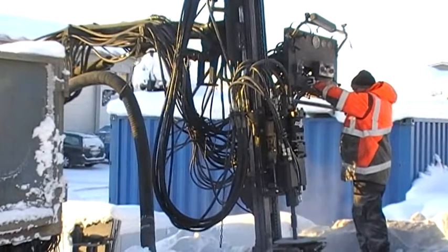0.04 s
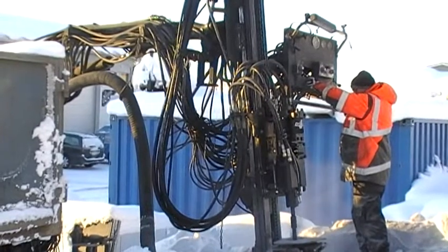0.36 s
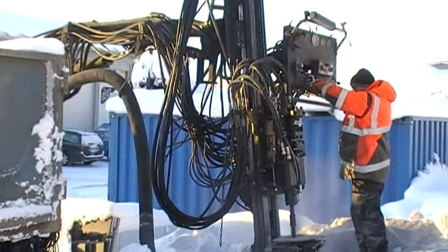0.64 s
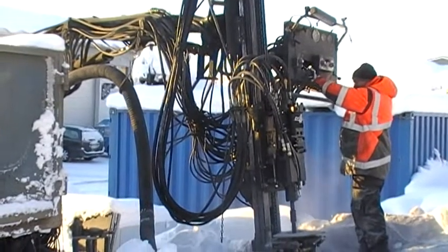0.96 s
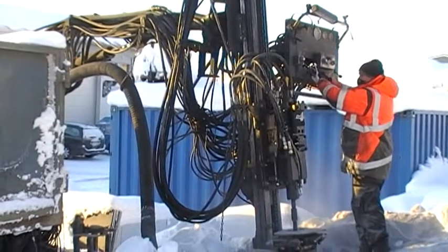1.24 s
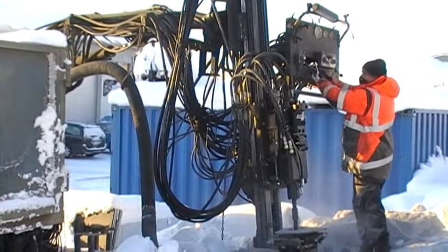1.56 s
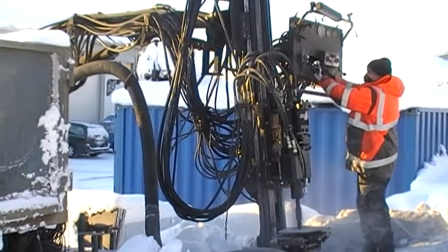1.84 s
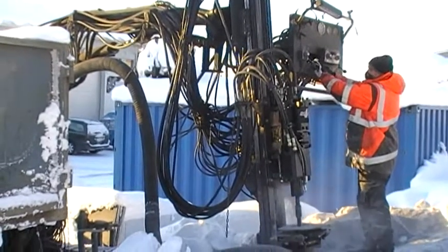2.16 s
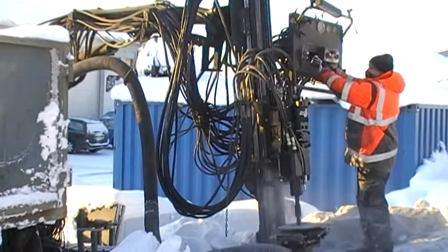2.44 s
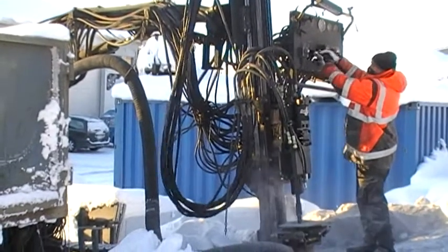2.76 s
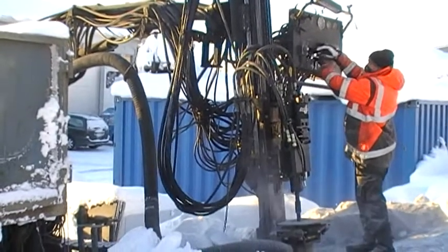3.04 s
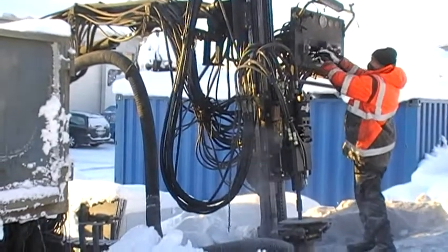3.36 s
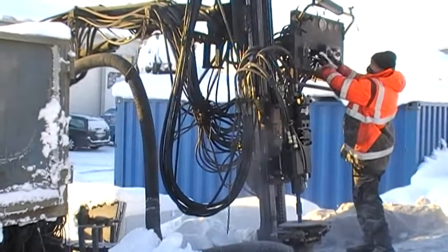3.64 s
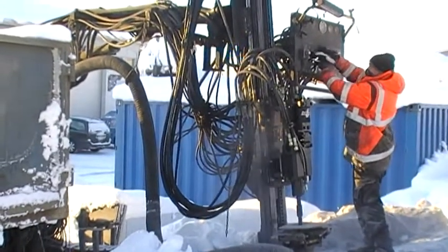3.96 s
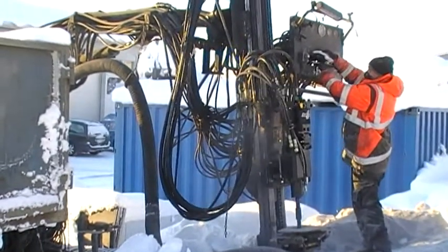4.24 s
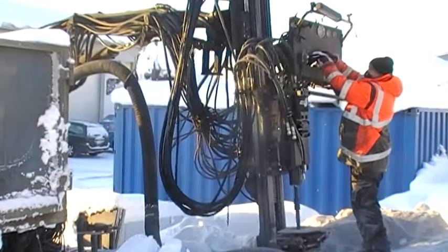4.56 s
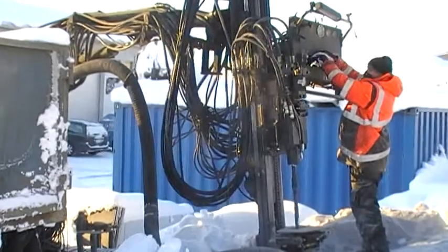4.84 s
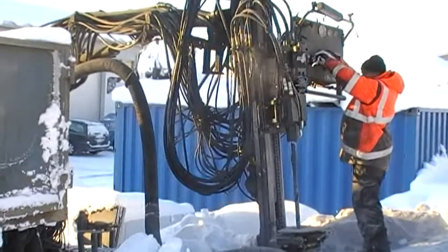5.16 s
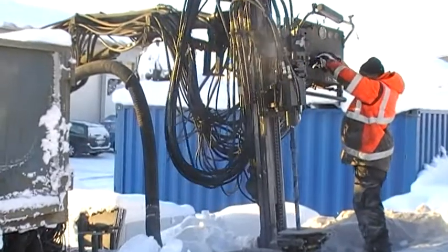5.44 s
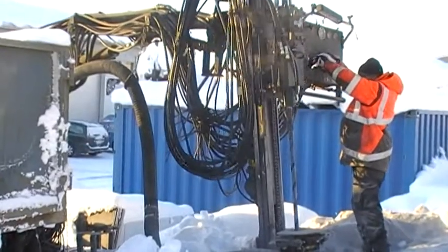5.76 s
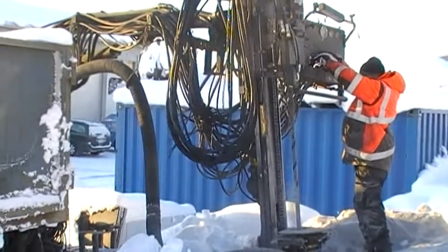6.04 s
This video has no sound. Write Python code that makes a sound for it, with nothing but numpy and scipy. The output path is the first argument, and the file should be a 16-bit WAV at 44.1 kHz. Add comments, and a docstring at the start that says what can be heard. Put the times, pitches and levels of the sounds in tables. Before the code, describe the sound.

A rock drill hammers steel rapidly and stops; diesel roar and air hiss swell, with clanks, shrill scraping and a wavering hydraulic squeal.

```python
"""A rock drill rig in a snowy yard, a few metres in front of a camera's stereo microphone, in gusty wind.
The hammer pounds the steel rod about fifty times a second and stops; as the gain control recovers,
diesel, fan and flushing air swell up. The turning rod clanks and scrapes shrilly, then the feed lifts
the drill head with a wavering hydraulic squeal, a chattering valve sounding through its pipes."""
import sys
import numpy as np
from scipy import signal
from scipy.fft import rfft, irfft
from scipy.io import wavfile
from scipy.ndimage import uniform_filter1d

SR = 44100
rng = np.random.default_rng(int(sys.argv[2]) if len(sys.argv) > 2 else 0)


def master(y):
    """Save y as 16-bit WAV."""
    cut = np.clip(np.atleast_2d(y).T, -1, 1)
    pcm = np.round(cut * 32767)  # scale
    wavfile.write(sys.argv[1], SR, pcm.astype(np.int16))


N = 273861
T = np.arange(N) / SR
HZ = np.fft.rfftfreq(N, 1 / SR)


def amp(db):
    """Decibels to gain."""
    return 10 ** (np.asarray(db) / 20)


def unit(x):
    """Scales to an rms of one."""
    return x / np.sqrt(np.mean(x ** 2) + 1e-20)


def curve(rows):
    """Joins (time, value) points by straight lines."""
    return np.interp(T, *np.transpose(rows))


def strokes(rows, fullness):
    """Gain of (start, length, dB) strokes that swell and fade in one arch; low fullness squares it off."""
    return sum(amp(db) * np.sin(np.pi * np.clip((T - start) / length, 0, 1)).clip(0) ** fullness
               for start, length, db in rows)


def spectrum(points):
    """Gain at every frequency from (Hz, dB) points."""
    hz, db = np.transpose(points)
    return amp(np.interp(np.log(HZ + 1), np.log(hz + 1), db))


def peaks(modes, hz):
    """Joint gain of (Hz, width, dB) resonances with steep skirts."""
    return np.sqrt(sum((amp(db) / (1 + ((hz - f) / width) ** 2)) ** 2 for f, width, db in modes))


def colour(x, gain):
    """Filters by a gain at every frequency."""
    return irfft(rfft(x) * gain, N)


def noise(gain):
    """Coloured noise of rms one."""
    return unit(colour(rng.standard_normal(N), gain))


def wander(hz):
    """Random drift of rms one, up to about the given rate."""
    times = np.linspace(0, T[-1], 4096)
    gain = np.exp(-(np.fft.rfftfreq(len(times), times[1]) / hz) ** 2)
    drift = irfft(rfft(rng.standard_normal(len(times))) * gain)
    return np.interp(T, times, unit(drift))


def ripple(spacing_hz, depth_db):
    """Gain ripple of many overlapping modes and echoes."""
    grid = np.arange(0, SR / 2, spacing_hz)
    return amp(depth_db * np.interp(HZ, grid, rng.standard_normal(SR)[:len(grid)]))


def phase(hz):
    """Running phase, in radians, of a changing pitch."""
    return 2 * np.pi * np.cumsum(hz) / SR


def tones(rows, flutter_db):
    """Machine tones from (Hz, width, dB) rows, each wavering in strength and pitch."""
    sound = np.zeros(N)
    for hz, width, db in rows:
        level = amp(db + flutter_db * wander(width + 2))
        pitch = hz + width / 2 * wander(width + 2)
        sound += level * np.sqrt(2) * np.sin(phase(pitch))
    return sound


def grit(per_s, spread_db):
    """Dense tiny impacts of uneven size."""
    sizes = amp(spread_db * np.minimum(rng.exponential(1, N), 4)) * rng.standard_normal(N)
    return unit(sizes * (rng.random(N) < per_s / SR))


def steel():
    """Response of the rod and mast: a broad body, strong resonances and a thicket of weak ones."""
    # broad body: (frequency [Hz], level [dB])
    outline = [(180, -45), (300, -7), (411, -9.5), (590, 0), (1070, -8), (1300, -4), (1730, -8), (2880, -5),
               (4490, -1.5), (4880, -1.5), (7140, 1), (9930, -0.5), (15500, -31)]
    # resonances of the rod and of the mast: (frequency [Hz], width [Hz], level [dB])
    rod_modes = [(600, 120, -16.5), (1287, 72, -7), (1895, 36, -3), (2100, 47, -0.5), (2440, 66, -6.5),
                 (2950, 7.5, -0.5), (3500, 30, -1), (4000, 33, 2), (4400, 61, 0), (5340, 14, -1.5),
                 (6250, 25, 5.5), (6200, 47, -1), (6940, 83, 1.5), (7300, 50, 5.5), (7940, 66, 2),
                 (8730, 300, -3), (9500, 69, -10.5), (10040, 100, -17.5), (11400, 39, -4.5)]
    mast_modes = [(239.5, 30, -6.5), (728, 5.3, 2.5)]
    thicket = spectrum(outline) * ripple(spacing_hz=40.36, depth_db=2.5)
    return np.hypot(thicket, amp(2.0) * peaks([*rod_modes, *mast_modes], HZ))


def hammer(body):
    """Each blow sets the rod clattering; bending waves carry the treble out first and the bass later."""
    # pace of the hammer: (time [s], blow rate [Hz])
    blow_rate = [(0, 52.42), (0.2, 50.64), (0.35, 49.05), (1.0, 48.43), (1.4, 50.28), (2.15, 50.11),
                 (2.45, 48.89), (2.62, 43.85)]
    # force of the blows: (time [s], level [dB])
    force = [(0, 5), (1.0, 2), (2.0, 3.5), (2.35, 4.5), (2.58, -0.2)]
    # rod modes ring out as the bit sinks: (start [s], end [s], frequency [Hz], width [Hz], level [dB])
    rings = [(.18, .42, 3960, 50, -13), (.5, 1.55, 6895, 10, -11), (.55, 1.95, 4560, 60, -11),
             (1.22, 1.44, 5365, 35, -12), (1.1, 1.42, 7680, 50, -12), (1.8, 2.25, 8480, 80, -14),
             (2.28, 2.68, 7150, 55, -9)]
    blows = np.cumsum(curve(blow_rate)) / SR + .6
    age = blows % 1 / curve(blow_rate)
    strength = amp(1.2 * rng.standard_normal(400))[blows.astype(int)]
    burst = strength * (1 - np.exp(-age / 0.0025)) * np.exp(-age / 0.0081)
    clatter = unit((unit(burst) + 0.47) * grit(per_s=22000, spread_db=1.24))
    lag_cycles = .37 * np.sqrt(HZ) - 0.002035 * HZ  # the delay falls with the root of frequency
    direct = np.clip(HZ / 4000, 0, 1) ** 0.42  # the mast smears the low notes into the next blow
    smeared = colour(rng.standard_normal(N), body * np.sqrt(1 - direct ** 2))
    sound = unit(colour(clatter, body * direct * np.exp(-2j * np.pi * lag_cycles)) + smeared)
    for start, end, hz, width, db in rings:
        swell = strokes([(start, end - start, db)], fullness=0.5)
        sound += swell * unit(colour(clatter, peaks([(hz, width, 0)], HZ)))
    bite_hz = 6.9  # the bit bites harder and softer as it turns
    bite_db = .6 * np.sin(2 * np.pi * bite_hz * T) + .4 * wander(12)
    stop_s, decay_db_per_s = 2.605, 522  # the hammer is shut off and the steel dies away
    stop_db = -decay_db_per_s * np.maximum(T - stop_s, 0)
    return sound * amp(curve(force) + bite_db + stop_db)


def engine():
    """Steady diesel and fan: a roar that throbs with the firing, and their tones."""
    # roar of the diesel and cooling fan: (frequency [Hz], level [dB])
    roar_shape = [(20, -47), (60, -24), (120, -16.5), (175, -11), (235, 0), (300, -4), (390, -8.5),
                  (500, -7), (575, -2.5), (680, -9.5), (950, -5), (1080, -9), (1600, -8.5), (2300, -15),
                  (3200, -50), (5000, -100)]
    # tones of the diesel, fan and main pump: (frequency [Hz], width [Hz], level [dB])
    hum = [(69.8, 0.42, -42), (101.6, 1.14, -40.5), (150.6, 1.5, -39), (202.6, 1.27, -30),
           (232.2, 10.1, -37.5), (347, 4.45, -39), (562.3, 4.55, -31), (628, 8.1, -38), (700.4, 5.4, -36),
           (855, 6.2, -36.5), (2192, 14.4, -38.5)]
    firing_hz = 101 + .5 * wander(4.9)
    throb = 1 + 0.11 * np.sin(phase(firing_hz))
    roar = noise(spectrum(roar_shape) * ripple(spacing_hz=18, depth_db=1.)) * throb
    return roar * amp(-19 + 1.1 * wander(9.8)) + tones(hum, flutter_db=0.5)


def air():
    """Flushing air hisses from the hole, sharpened by the grit that it carries against the rod."""
    # colour of the hiss: (frequency [Hz], level [dB])
    hiss_shape = [(2120, -29), (3600, 1), (4710, -1.5), (5320, -2), (5870, -1.5), (7360, -3.5),
                  (8110, -1.5), (11200, -18.5), (15500, -51)]
    # air flow: (time [s], level [dB])
    flow = [(3.2, -21.5), (3.7, -21.5), (4.2, -23), (4.9, -24.5), (5.3, -22.5), (6.2, -23)]
    echoes = ripple(spacing_hz=45, depth_db=1.3)
    shape = np.maximum(spectrum(hiss_shape), amp(2.5) * peaks([(2970, 1100, 0)], HZ))
    hiss = colour(grit(per_s=20000, spread_db=0.5), shape * echoes)
    bright = colour(hiss, np.clip(HZ / 5000, .6, 3))
    return amp(curve(flow) + 0.71 * wander(22)) * unit(hiss + bright)


def wind():
    """Lumpy gusts push the two microphone ports against each other, over a faint common rumble."""
    # wind on the microphone: (time [s], level [dB])
    strength = [(0, -19.5), (1.1, -23), (1.6, -33), (2.3, -35), (2.6, -31), (3.4, -43), (5.4, -58),
                (6.0, -49), (6.17, -35)]
    # its rumble: (frequency [Hz], level [dB])
    rumble = [(10, -12), (25, -1), (60, -4), (95, -1), (150, -6), (250, -11), (500, -19), (1000, -20),
              (2000, -60), (5000, -90)]
    gusts = noise(spectrum(rumble)) * amp(curve(strength) + 2.7 * wander(12))
    common = 0.18 * noise(spectrum(rumble)) * amp(curve(strength))
    return np.array([gusts, -gusts]) + common


def scrape():
    """Uneven slips of the turning rod shake its shrill modes until one of them takes over and sings."""
    # modes of the rubbed steel: (frequency [Hz], width [Hz], level [dB])
    shrill_modes = [(8802, 40, -12), (9130, 42, -1.5), (9405, 45, 0), (9700, 36, 2.5), (10099, 35, -6),
                    (10480, 35, -16)]
    # rubs, the light contact beneath them, and spells of singing: (start [s], length [s], level [dB])
    rubs = [(2.94, 0.12, -29), (3.105, 0.089, -20), (3.285, .06, -29), (3.345, 0.05, -14.5),
            (3.41, 0.065, -17.5), (3.465, 0.065, -27), (3.62, .15, -19), (3.79, 0.069, -23.5),
            (3.925, 0.14, -18)]
    light_rub = (2.7, 1.63, -30)
    sings = [(3.92, 0.23, -25), (4.098, .108, -12), (4.214, 0.11, -14), (4.322, 0.15, -16.5),
             (4.44, .14, -28)]
    shrill = peaks(shrill_modes, HZ)
    slips = amp(2.5 * wander(70))
    contact = strokes(rubs, fullness=0.96) + strokes([light_rub], fullness=0.4)
    rasp = noise(shrill) * slips * contact
    sing_hz = 9683 + 3 * wander(25)
    rough_tone = np.sqrt(2) * np.sin(phase(sing_hz)) + .18 * noise(shrill)
    return rasp + strokes(sings, fullness=.9) * rough_tone


def clanks(body):
    """The loose rod knocks in its guide and rings the same steel as the hammer."""
    # knocks: (time [s], level [dB], time to fall 60 dB [s])
    knocks = [(2.73, -11, 0.18), (2.784, -15, .12), (2.836, -14, 0.21), (2.871, -24, 0.12),
              (2.914, -15.5, .12), (2.975, -12, 0.087), (3.014, -10, 0.11), (3.267, -18, .08),
              (3.341, -16, .07), (3.443, -14, 0.069), (3.511, -12, 0.11), (3.597, -13.5, 0.066),
              (3.72, -18, .12), (3.85, -15, 0.15), (3.906, -16, .07), (4.085, -18, .15), (4.23, -23, .12),
              (5.55, -16, 0.067), (5.736, -21, .05)]
    level = np.zeros(N)
    for start, db, t60 in knocks:
        age = np.maximum(T - start, 0)
        level += amp(db - 60 * age / t60) * (1 - np.exp(-age / 0.0018))
    return level * unit(colour(grit(per_s=14000, spread_db=1.3), body))


def oil():
    """Oil whines through the feed motor and rushes through the hoses as the head speeds up."""
    # whine of the motor: (frequency [Hz], width [Hz], level [dB])
    whine = [(1265, 4, -39), (1523, 12, -37.5), (1683, 22, -39), (2530, 16, -40), (2681, 45, -38.5),
             (2860, 60, -35), (3385, 18, -41)]
    # flow in the motor and in the hoses: (time [s], level [dB])
    motor_flow = [(4.2, -60), (4.45, 1), (4.58, 2), (5.5, 4), (6.0, 0.5), (6.21, 1)]
    hose_flow = [(4.4, -60), (4.6, -43), (5.1, -41), (5.28, -27), (5.45, -27), (5.7, -29), (5.9, -47),
                 (6.2, -32)]
    rush = amp(curve(hose_flow)) * noise(peaks([(1830, 530, 0)], HZ))
    return rush + amp(curve(motor_flow)) * tones(whine, flutter_db=2.0)


def valve():
    """The feed valve chatters; a harmonic squeals out whenever it slides through a pipe resonance."""
    # pitch of the chatter: (time [s], frequency [Hz])
    pitch = [(4.47, 305), (4.555, 389), (4.8, 383), (4.89, 375), (4.95, 391), (5.08, 385), (5.14, 358),
             (5.225, 394), (5.27, 320), (5.37, 342), (5.415, 305), (5.455, 366), (5.51, 352), (5.565, 300),
             (5.62, 365), (5.68, 320), (5.77, 388), (5.81, 352), (5.9, 395), (5.96, 376), (6.2, 384)]
    # its strength: (time [s], level [dB])
    strength = [(4.5, -26), (4.72, -22), (4.82, -28), (4.9, -23), (5.08, -24), (5.35, -21.5), (5.5, -24.5),
                (5.7, -23.5), (5.97, -22.5), (6.06, -29), (6.2, -28)]
    # its strong harmonics: (multiple, level [dB])
    harmonics = [(2, -4.5), (4, -1.5), (7, -5.5), (8, -0.5), (9, -10)]
    # the pipes that radiate it: (frequency [Hz], width [Hz], level [dB])
    pipes = [(726, 130, 1), (1521, 25, 0), (2910, 75, 4), (2850, 690, -1)]
    hz = curve(pitch) * (1 + .008 * wander(110))
    buzz = np.zeros(N)
    for multiple, db in harmonics:
        level = amp(db + 2.2 * wander(25)) * peaks(pipes, multiple * hz)
        buzz += level * np.sin(multiple * phase(hz) + rng.uniform(0, 2 * np.pi))
    shut_hz, open_hz = 305, 335  # the chatter fades out as its pitch sags
    opened = np.clip((hz - shut_hz) / (open_hz - shut_hz), 0, 1) * (T > pitch[0][0])
    return amp(curve(strength)) * opened * buzz


def head_squeaks():
    """The drill head squeaks on the mast as it rises."""
    # squeaks: (start [s], length [s], level [dB])
    squeaks = [(5.205, .05, -27), (5.33, .055, -26.5)]
    # resonances of the sliding head: (frequency [Hz], width [Hz], level [dB])
    slide_modes = [(3840, 60, 0), (4200, 80, -2), (4620, 90, -3)]
    return strokes(squeaks, fullness=1) * noise(peaks(slide_modes, HZ))


def scene():
    """The rig stands straight ahead of the microphone; containers and snow scatter a little of it."""
    # sound scattered in from the sides: (frequency [Hz], level [dB])
    scatter = [(100, -45), (250, -25.5), (1300, -27), (2400, -32.5), (4400, -19.5), (8100, -10),
               (9700, -5.5), (15000, -9.5)]
    body = steel()
    drill = hammer(body) + clanks(body)
    machine = engine() + air() + oil() + valve() + head_squeaks()
    shrill = scrape()
    echoes = rng.standard_normal(2048) * np.exp(-np.arange(2048) / SR / 0.0133)
    echo_phases = np.exp(1j * np.angle(rfft(echoes, N)))
    side = colour(0.76 * drill + machine, spectrum(scatter) * echo_phases)
    # a quarter-cycle phase shift widens the scrape and keeps it equally loud on both sides
    side += colour(shrill, 1j * spectrum(scatter))
    rig = drill + machine + shrill
    return np.array([rig + side, rig - side]) + wind()


def record(dry):
    """The camera's gain control clamps down at once and recovers slowly; a low-pass follows."""
    threshold_db, recovery_db_per_s, ceiling, cutoff_hz = -15.5, 29.0, .85, 15750
    # the gain is keyed by the band where the ear is keenest
    key = signal.lfilter(*signal.butter(2, [1000, 8800], "band", fs=SR), dry)
    power_db = 10 * np.log10(abs(uniform_filter1d((key ** 2).mean(0), size=400)) + 1e-12)
    fall_db = T * recovery_db_per_s
    peak_db = np.maximum.accumulate(power_db + fall_db) - fall_db
    over_db = np.maximum(peak_db - threshold_db, 0)
    held = dry / amp(uniform_filter1d(over_db, size=200))
    rounded = held / (1 + (held / ceiling) ** 6) ** (1 / 6)  # soft clipping of the tallest peaks
    lowpass = signal.firwin(511, cutoff_hz, window=("kaiser", 9), fs=SR)
    return signal.oaconvolve(rounded, lowpass[None], "same")


dry = scene()
out = record(dry)
master(out)
```